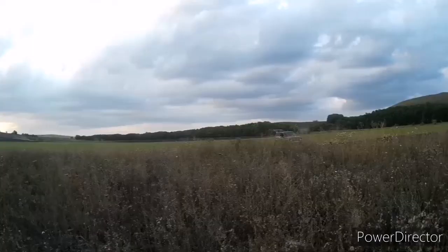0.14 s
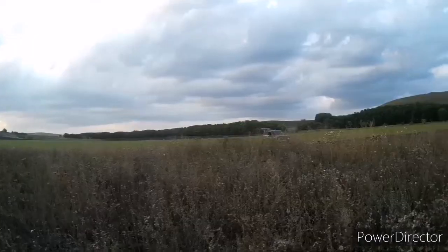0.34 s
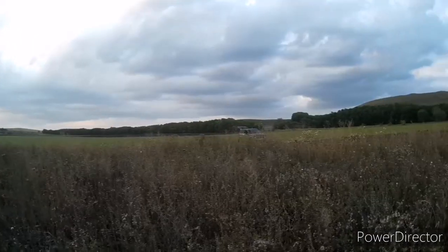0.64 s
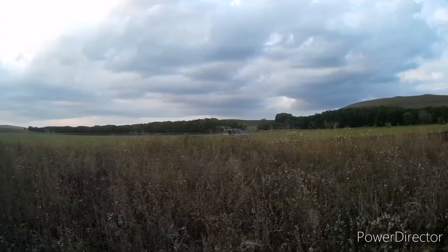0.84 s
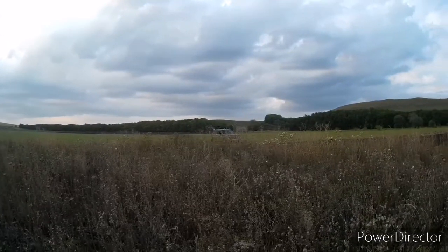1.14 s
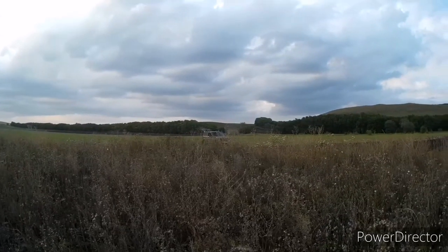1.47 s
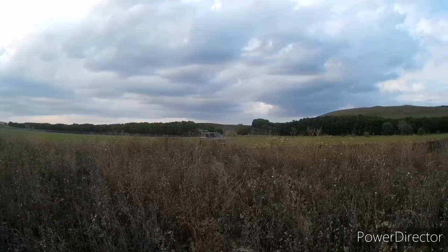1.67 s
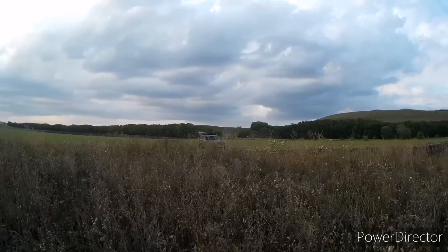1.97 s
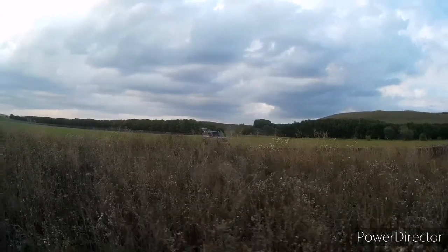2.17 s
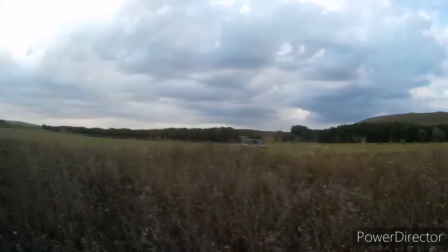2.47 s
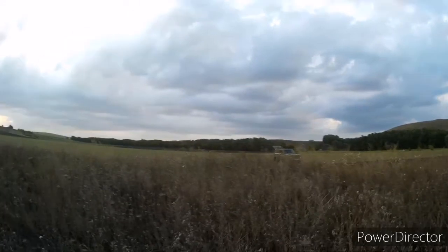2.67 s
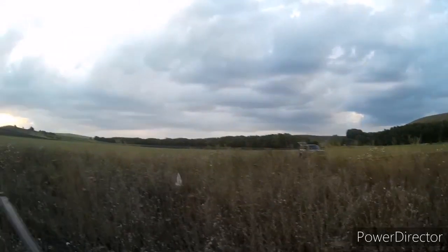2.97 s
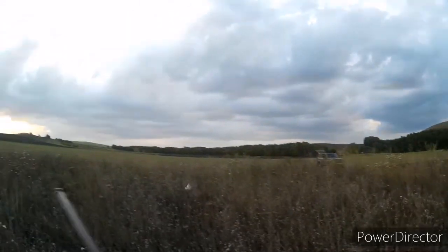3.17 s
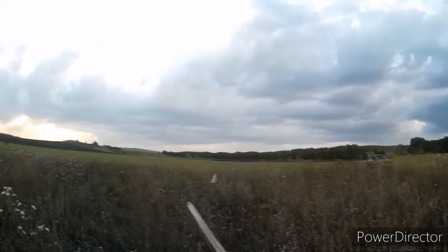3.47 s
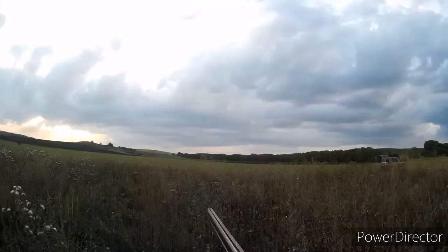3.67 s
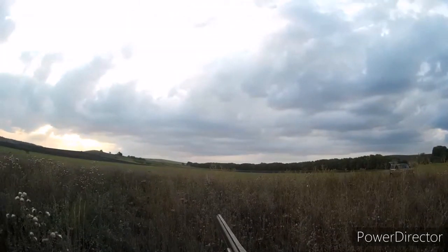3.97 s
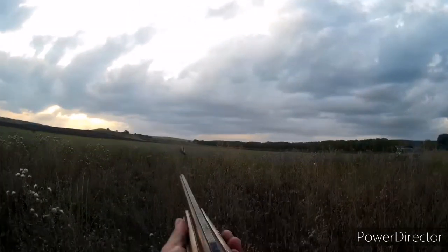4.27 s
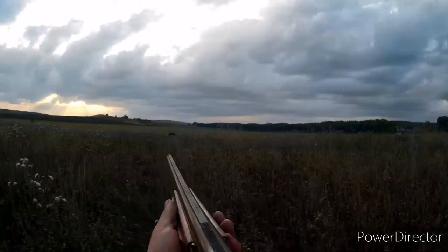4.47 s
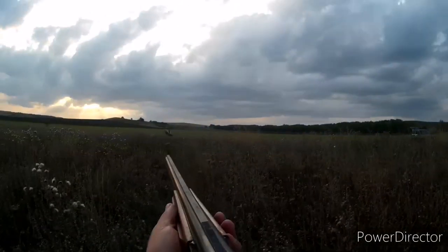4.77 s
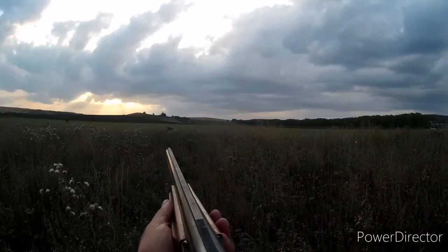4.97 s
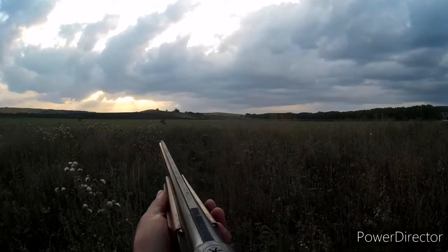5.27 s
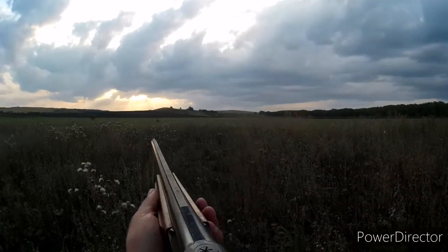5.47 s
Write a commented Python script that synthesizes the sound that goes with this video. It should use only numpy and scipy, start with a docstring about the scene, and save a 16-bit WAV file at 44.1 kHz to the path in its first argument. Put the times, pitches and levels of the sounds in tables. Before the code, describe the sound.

A moment of crisp grass rustle gives way to muffled wind, humming and rumbling around an enclosed, body-worn microphone in a field. Faint scratches of dry stalks and scattered plastic ticks come through. Someone swings a shotgun up, making two louder, close swells of rubbing cloth with soft knocks and clicks. The movement then settles to light rubbing and occasional taps while the hollow air continues.

```python
"""Shotgun raised in dry grass

Someone swings a shotgun up to aim, without firing. A moment of bright, open grass rustle cuts to
the hollow drone of air around a camera's case, which muffles the rest. Clothing rubs twice as the
gun comes up, with dull bumps; stalks scratch the clothes and gear ticks against the case."""
import sys
import numpy as np
from scipy import signal
from scipy.fft import rfft, irfft, next_fast_len
from scipy.io import wavfile
from scipy.ndimage import map_coordinates

SR = 44100
rng = np.random.default_rng(int(sys.argv[2]) if len(sys.argv) > 2 else 0)


def store_wav(level_fs):
    """Save 16-bit WAV to argv[1]."""
    pcm = np.round(np.clip(np.atleast_2d(level_fs), -1, 1) * 32767)
    wavfile.write(sys.argv[1], SR, pcm.T.astype(np.int16))


N = 247842
TIME_S = np.arange(N) / SR


def amp(db):
    """Decibels to gain."""
    return 10 ** (np.asarray(db) / 20)


def unit(x):
    """Scale to rms 1."""
    return x / np.sqrt(np.mean(x ** 2) + 1e-20)


def decay(t, t60_s):
    """Exponential fall, 60 dB in t60_s."""
    return amp(-60 * t / t60_s)


def rise(at_s, width_s):
    """Smooth step from 0 to 1."""
    return 0.5 + 0.5 * np.tanh((TIME_S - at_s) / width_s)


def swell(peak_s, level_db, rise_s, fall_s):
    """Power of one movement, 10 dB down at rise_s before its peak and fall_s after."""
    t = TIME_S - peak_s
    return amp(level_db - 10 * (t / np.where(t < 0, rise_s, fall_s)) ** 2) ** 2


def wobble(knots_per_s):
    """Smooth random curve."""
    knots = rng.standard_normal(int(N * knots_per_s / SR) + 4)
    return map_coordinates(knots, [TIME_S * knots_per_s])


def filtered(x, response):
    """Apply a gain given as a function of Hz."""
    size = next_fast_len(N + 8192)
    return irfft(rfft(x, size) * response(np.fft.rfftfreq(size, 1 / SR)), size)[:N]


def coloured(x, spectrum):
    """Shape x by (freq_hz, gain_db) rows, at rms 1."""
    freq_hz, gain_db = np.transpose(spectrum)
    return unit(filtered(x, lambda hz: amp(np.interp(np.log(hz + 1), np.log(freq_hz), gain_db))))


def grains(per_s, spread_db):
    """Random tiny slips of uneven size, at rms 1."""
    size = amp(spread_db * np.minimum(rng.exponential(size=N), 4))
    return unit((rng.random(N) < per_s / SR) * size * rng.choice([-1, 1], N))


def narrow_noise(centre_hz, width_hz):
    """Noise band around a moving centre, at rms 1."""
    a, b = (filtered(rng.standard_normal(N), lambda hz: 1 / (1 + (hz / width_hz) ** 2)) for _ in range(2))
    phase = 2 * np.pi * np.cumsum(centre_hz) / SR
    return unit(a * np.cos(phase) + b * np.sin(phase))


def add(track, start_s, sound):
    """Mix a sound into the track."""
    part = track[round(start_s * SR):][:len(sound)]
    part += sound[:len(part)]


# Microphone noise: freq_hz, gain_db
HISS_SPECTRUM = [(300, 4.5), (1000, 0.5), (1700, 0), (2500, -3), (3050, -2), (3600, -6), (4200, -10.5),
                 (4900, -12.5), (5600, -25.5), (6800, -40), (9000, -37), (11300, -28), (15000, -38.5)]


def hiss():
    """The microphone's steady, dull hiss."""
    return amp(-67) * coloured(rng.standard_normal(N), HISS_SPECTRUM)


def hoot(start_s=1.385, end_s=1.485, pitch_hz=567, level_db=-52):
    """A faint, unsteady hollow tone swells and fades, rising slightly."""
    progress = np.clip((TIME_S - start_s) / (end_s - start_s), 0, 1)
    glide_hz = pitch_hz * (1 + 0.03 * (progress - 0.5) + 0.005 * wobble(40))
    envelope = np.sqrt(np.abs(np.sin(np.pi * progress)))
    return amp(level_db) * envelope * np.sin(2 * np.pi * np.cumsum(glide_hz) / SR)


# Case shaking: freq_hz, gain_db
RUMBLE_SPECTRUM = [(15, -12.5), (45, 10), (90, 9), (130, 5), (200, -12.5), (400, -63.5), (2000, -120)]
# Cavity drone, gun down: freq_hz, gain_db
LOWERED_SPECTRUM = [(90, -20.5), (130, -10.5), (160, -2.5), (200, -3), (238, -0.5), (268, -2.5),
                    (320, -12.5), (380, -19), (470, -29.5), (700, -54), (3000, -120)]
# Cavity drone, gun up: freq_hz, gain_db
AIMING_SPECTRUM = [(90, -20.5), (130, -9), (160, -2.5), (195, -5.5), (235, 2), (280, -4), (340, -9.5),
                   (440, -15.5), (520, -25.5), (620, -41.5), (3000, -120)]
# Air past the case: time_s, level_db
AIRFLOW = [(0.23, -35), (0.3, -37), (0.36, -44), (0.41, -34), (0.6, -39), (0.69, -34.5), (0.78, -38),
           (1.86, -37.5), (1.93, -40), (1.98, -36.5), (2.86, -39.5), (3.14, -32.5), (3.17, -39.5),
           (3.53, -31.5), (3.8, -40.5), (5.6, -41.5)]


def air(firmness):
    """Air shakes the case and drones in its cavity; pressed cloth adds rumble and damps the drone."""
    flow_db = np.interp(TIME_S, *np.transpose(AIRFLOW))
    rumble = amp(-11 + firmness) * coloured(rng.standard_normal(N), RUMBLE_SPECTRUM)
    eddies = rng.standard_normal(N) * amp(0.5 * wobble(7.5))
    aiming = rise(at_s=2.8, width_s=0.15)
    cavity = (1 - aiming) * coloured(eddies, LOWERED_SPECTRUM)
    cavity += aiming * coloured(eddies, AIMING_SPECTRUM)
    drone = amp(0.5 - 0.5 * firmness) * unit(cavity)
    return amp(flow_db) * (rumble + drone)


# Grass in the open: freq_hz, gain_db
RUSTLE_SPECTRUM = [(20, -26), (60, -12), (150, -7.5), (200, -5.5), (450, -3), (720, -0.5), (1250, -3),
                   (1700, -11), (2000, -23.5), (2400, -20), (3200, -27.5), (4200, -29.5), (6500, -38),
                   (12000, -38), (15500, -44.5)]
# Stalks cracking: start_s, level_db, pitch_hz
STALK_CRACKS = [(0.094, -49, 2600), (0.130, -44.5, 4260)]


def open_rustle():
    """Dry grass rustles in clumps of fine crackle, and two stalks crack."""
    crackle = rng.standard_normal(N) + 0.5 * grains(per_s=1100, spread_db=3)
    clumps = amp(1.3 * wobble(49))
    track = amp(-42) * clumps * coloured(crackle, RUSTLE_SPECTRUM)
    t = np.arange(SR // 64) / SR
    for start_s, level_db, pitch_hz in STALK_CRACKS:
        split = 0.35 * rng.standard_normal(len(t)) * decay(t, t60_s=0.005)
        ping = np.sin(2 * np.pi * pitch_hz * t) * decay(t, t60_s=0.0053)
        add(track, start_s, amp(level_db) * (split + ping))
    return track


# Stalk scratch: freq_hz, gain_db
SCRATCH_SPECTRUM = [(500, -31.5), (950, -8), (1150, 5.5), (1350, -0.5), (1650, -4.5), (2100, 1), (2500, -6),
                    (3050, -3.5), (4000, -14.5), (5000, -15), (6500, -31), (9000, -120)]
# Stalks brushing past: peak_s, level_db, rise_s, fall_s
STALK_BRUSHES = [(0.43, -68, .1, 0.16), (0.59, -67, .04, .07), (0.72, -71.5, .08, 0.2),
                 (1.02, -70, .07, 0.092), (3.48, -73, .1, .08), (3.64, -62.5, .05, 0.034),
                 (3.75, -68, .05, .06), (5.61, -65.5, .14, 0.092)]


def stalks(rest_db=-74):
    """Dry stalks scratch along the clothes in many tiny catches."""
    power = amp(rest_db) ** 2 + sum(swell(*brush) for brush in STALK_BRUSHES)
    catches = rng.standard_normal(N) + grains(per_s=440, spread_db=4)
    return np.sqrt(power) * coloured(catches, SCRATCH_SPECTRUM)


# Plastic case: freq_hz, gain_db, t60_s
CASE_MODES = [(562, 0.5, 0.077), (650, -1.5, 0.037), (734, -4.5, 0.041), (879, -2, 0.066),
              (1010, -4, 0.026), (1150, -6.5, 0.0088), (1270, -9, 0.03), (1500, -14.5, 0.041),
              (1973, -16, 0.028), (2977, -18, 0.066)]
# Gear on the case: start_s, level_db, pitch_hz, snap_gain_db, t60_ratio
GEAR_CONTACTS = [(0.279, -40.5, 1010, -10, 0.57), (0.570, -51, 826, -12, 0.54),
                 (1.822, -48, 933, -22, 0.72), (2.019, -48.5, 677, -30, .7), (2.048, -48, 700, -19.5, 1.02),
                 (2.249, -45.5, 750, -20, .7), (2.357, -37.5, 970, -15, 0.61), (2.716, -51, 795, -14, 0.56),
                 (2.985, -34.5, 623, -30.5, 1.3), (2.994, -30, 871, -24, 1.14),
                 (3.279, -39.5, 1020, -33, .8), (3.404, -40.5, 991, -20, .8), (3.528, -32.5, 530, -33, .8),
                 (3.572, -34, 560, -25, .7), (3.597, -35.5, 905, -25, 1.1), (3.64, -42.5, 899, -12, 0.78),
                 (3.68, -37.5, 1010, -23, .7), (3.748, -44.5, 1190, -17.5, .7),
                 (4.1, -43.5, 1102, -12, 0.67), (4.124, -49, 1050, -13, .6), (4.237, -38, 680, -26, 0.28),
                 (4.421, -52, 869, -16, 0.55), (4.746, -42.5, 800, -16, 0.33), (5.407, -48, 1340, -8, 0.76),
                 (5.581, -44.5, 888, -21, 0.86)]


def gear_ticks(muffle_hz=3200):
    """Gear strikes and scuffs the case with a thin snap, ringing the modes each spot favours."""
    rings, snaps = np.zeros(N), np.zeros(N)
    t = np.arange(SR // 8) / SR
    attack = 1 - np.exp(-t / 0.00055)
    for start_s, level_db, pitch_hz, snap_gain_db, t60_ratio in GEAR_CONTACTS:
        modes = np.zeros(len(t))
        for freq_hz, gain_db, t60_s in CASE_MODES:
            octaves_off = np.abs(np.log2(freq_hz / pitch_hz))
            gain = amp(gain_db - 17.5 * np.tanh(octaves_off / 0.39) + rng.normal(0, 1))
            tone = np.sin(2 * np.pi * (freq_hz * t + rng.random()))
            modes += gain * decay(t, t60_ratio * t60_s) * tone
        scuff = 0.22 * rng.standard_normal(len(t)) * decay(t, t60_s=0.036)
        scuff[0] = 1  # first touch
        ring = signal.fftconvolve(scuff, modes * attack)[:len(t)]
        add(rings, start_s, amp(level_db) * ring / np.abs(ring).max())
        snap = rng.standard_normal(len(t)) * decay(t, t60_s=0.1)
        add(snaps, start_s, amp(level_db + snap_gain_db) * snap)
    thin_snaps = filtered(snaps, lambda hz: hz / (hz + 1100))
    # the closed case passes little treble
    return filtered(rings + thin_snaps, lambda hz: 1 / np.sqrt(1 + (hz / muffle_hz) ** 8))


# Pushes on the mount: centre_s, peak_db, pitch_hz
MOUNT_BUMPS = [(3.0012, -32.5, 400), (3.078, -24.5, 288), (3.4581, -23, 294), (3.505, -29, 244.6),
               (3.529, -26, 460), (3.5409, -19, 344), (3.5755, -32, 363), (4.2386, -25.5, 333.5),
               (4.2397, -31, 463), (4.596, -38, 258), (4.75, -40, 353.6)]


def bumps():
    """Each soft push swings the mount for about one cycle."""
    track = np.zeros(N)
    t = np.arange(-SR // 64, SR // 64) / SR
    for centre_s, peak_db, pitch_hz in MOUNT_BUMPS:
        swing = np.sin(2 * np.pi * pitch_hz * t) * np.exp(-2 * (pitch_hz * t) ** 2)
        add(track, centre_s + t[0], amp(peak_db) * swing / np.abs(swing).max())
    return track


# Cloth over the case: peak_s, drive_db, rise_s, fall_s, scrape_hz
CLOTH_STROKES = [(0.44, -57, 0.12, .07, 1154), (0.589, -57, 0.055, 0.22, 1140),
                 (1.42, -59, 0.093, 0.069, 800), (1.8, -61, .14, .08, 790), (2.038, -57.5, 0.13, .08, 720),
                 (2.242, -57.5, 0.02, .04, 780.5), (2.39, -57.5, 0.075, .22, 951),
                 (2.99, -47.5, .26, 0.29, 830), (3.541, -44, .19, 0.26, 948.3), (4.1, -57.5, .18, .06, 863),
                 (4.432, -56, 0.082, 0.095, 904), (5.6, -58.5, .3, .1, 889)]


def cloth_motion(rest_db=-62, rest_hz=842, firm_above_db=-55):
    """Strokes over a slow creep set drive, pitch and firmness (0-1); two strong ones lift the gun."""
    creep = np.full(N, amp(rest_db) ** 2)
    powers = np.array([creep] + [swell(*stroke[:-1]) for stroke in CLOTH_STROKES])
    pitches_hz = np.array([rest_hz] + [stroke[-1] for stroke in CLOTH_STROKES])
    total_power = powers.sum(axis=0)
    drive_db = 10 * np.log10(total_power)
    scrape_hz = pitches_hz @ powers / total_power
    firmness = 1 / (1 + np.exp(-(drive_db - firm_above_db) / 0.5))
    return drive_db, scrape_hz, firmness


# Light sliding: freq_hz, gain_db
LIGHT_RUB_SPECTRUM = [(250, -19.5), (430, -12), (505, -7), (575, 7), (690, 3), (800, -5), (900, -9),
                      (1000, -15), (1150, -4.5), (1450, -19), (3000, -27), (6000, -60), (9000, -120)]
# Body of a firm stroke: freq_hz, gain_db
FIRM_RUB_SPECTRUM = [(30, -22), (55, -8), (90, 8), (145, 7), (205, -1), (325, 18), (420, 8), (500, -2),
                     (590, -0.5), (780, -9.5), (930, -12), (1400, -24), (1800, -37), (3200, -37.5),
                     (6000, -57.5), (9000, -120)]


def cloth(drive_db, scrape_hz, firmness, shouldered_s=3.2):
    """Cloth slips and scrapes over the case; a firm stroke couples more of its low body."""
    slack_db = -2 * rise(shouldered_s, width_s=0.17)  # slack cloth rubs more softly
    light_slips = rng.standard_normal(N) + grains(per_s=500, spread_db=2.5)
    light = amp(-4 + slack_db) * coloured(light_slips, LIGHT_RUB_SPECTRUM)
    firm_slips = rng.standard_normal(N) + grains(per_s=260, spread_db=2)
    body = amp(9) * coloured(firm_slips, FIRM_RUB_SPECTRUM)
    scrape = amp(-10) * narrow_noise(scrape_hz, width_hz=120)
    catching = amp(1.5 * wobble(70))  # folds catch and let go
    return amp(drive_db) * catching * (light + firmness * body + scrape)


def scene():
    """The open rustle cuts to the muffled sound inside the case."""
    drive_db, scrape_hz, firmness = cloth_motion()
    inside = air(firmness) + cloth(drive_db, scrape_hz, firmness)
    inside += stalks() + gear_ticks() + bumps() + hoot() + hiss()
    cut = rise(at_s=0.2168, width_s=0.0004)
    return ((1 - cut) * open_rustle() + cut * inside)[None]


def record(dry, top_hz=15700):
    """The camera keeps nothing above its band limit."""
    return filtered(dry[0], lambda hz: hz < top_hz)[None]


dry = scene()
out = record(dry)
store_wav(out)
```